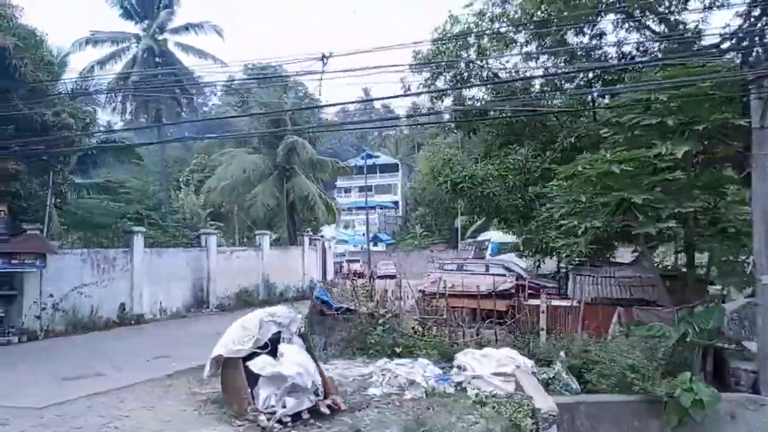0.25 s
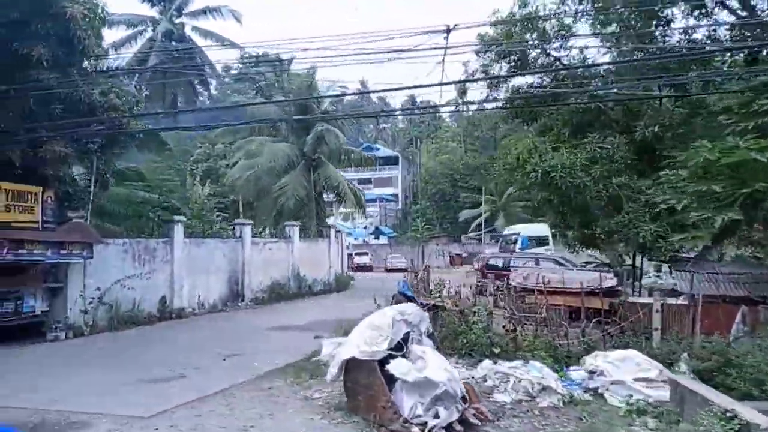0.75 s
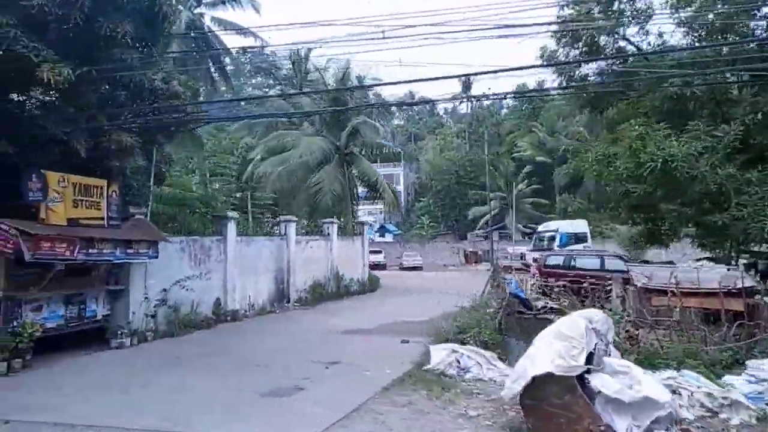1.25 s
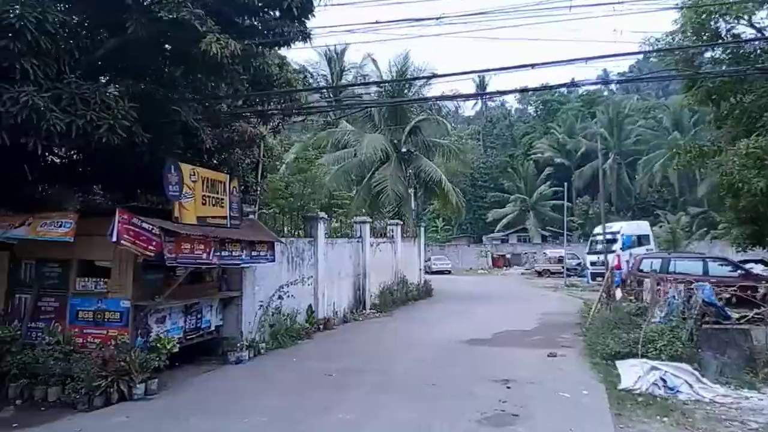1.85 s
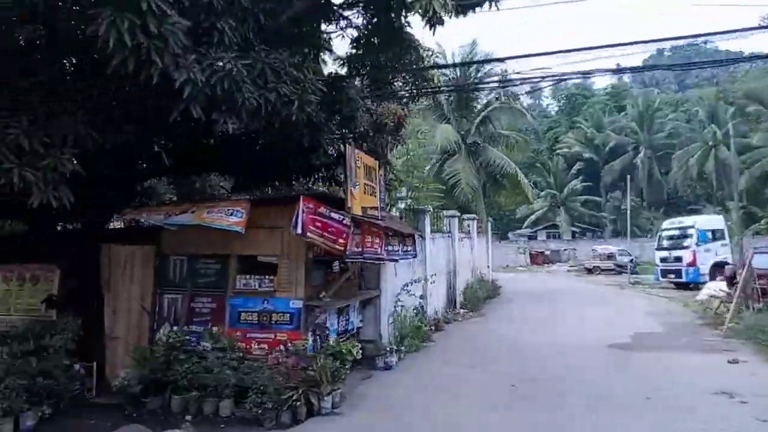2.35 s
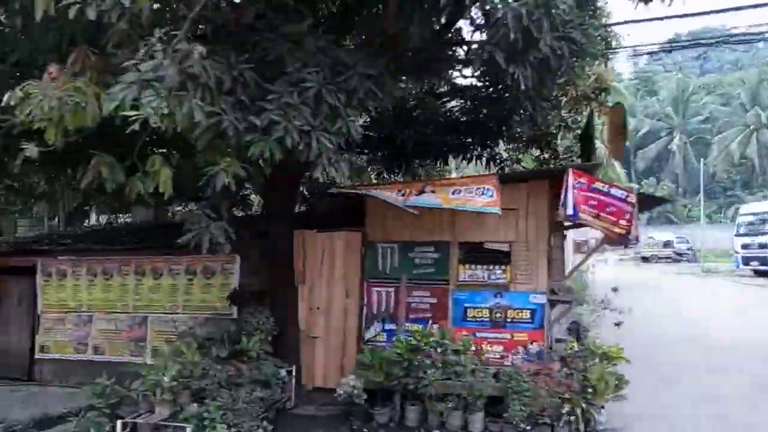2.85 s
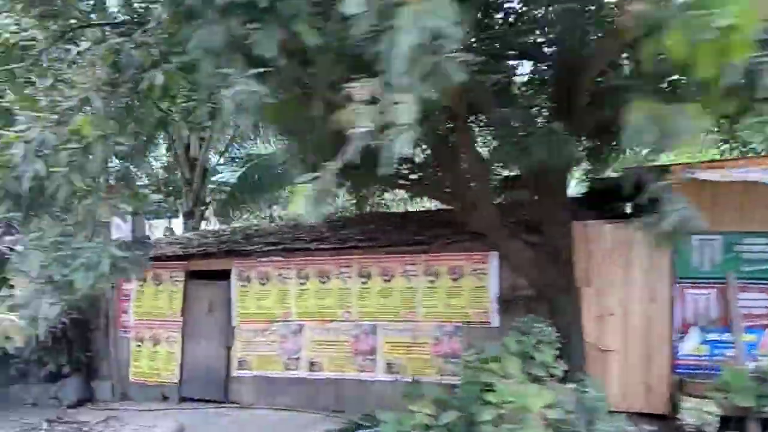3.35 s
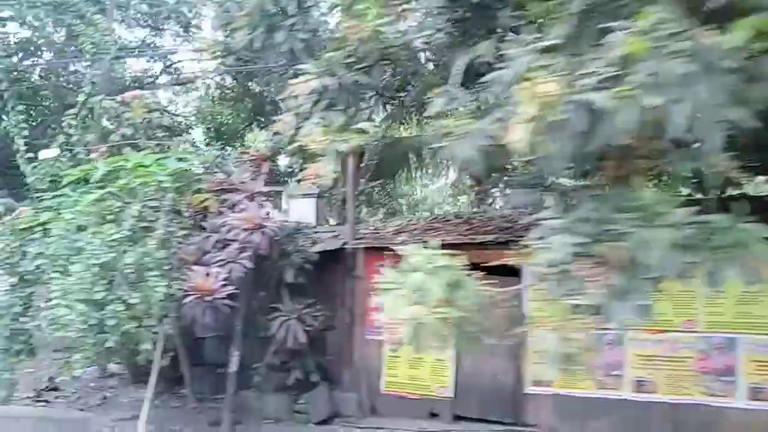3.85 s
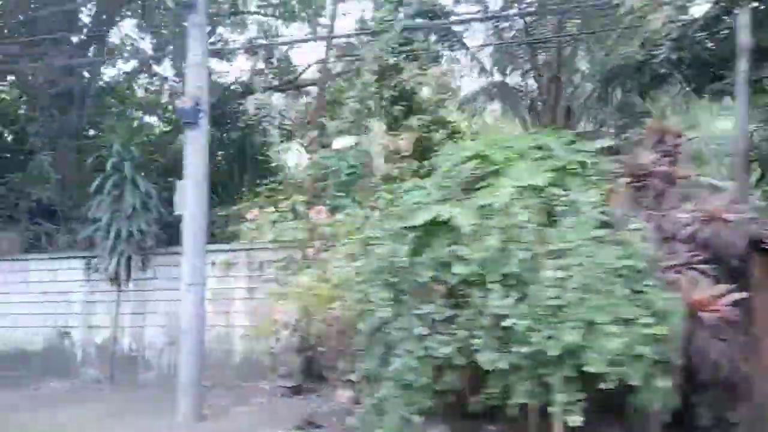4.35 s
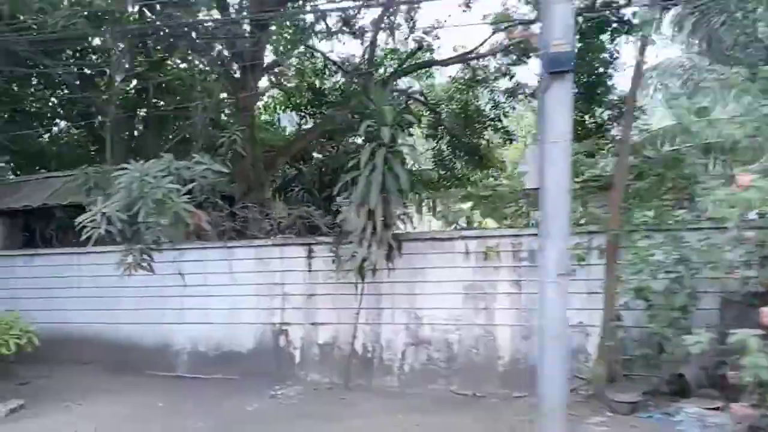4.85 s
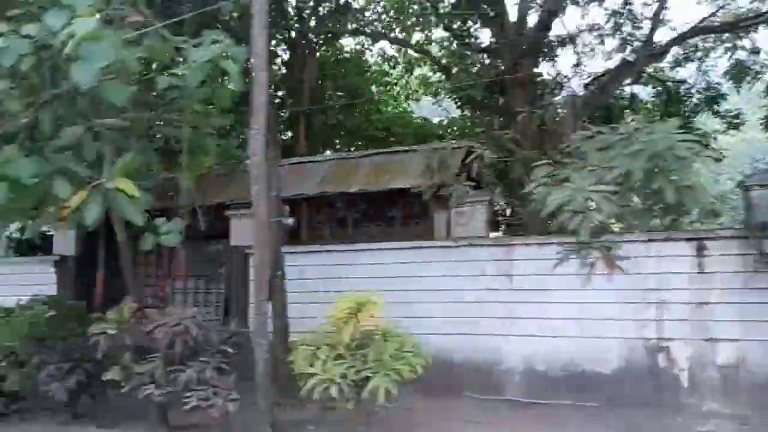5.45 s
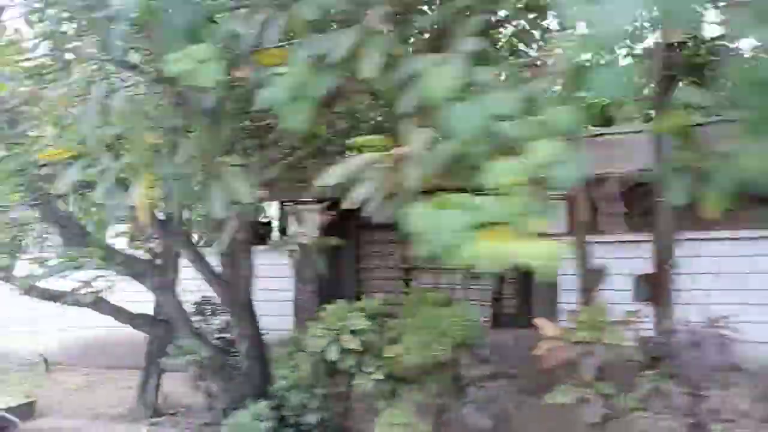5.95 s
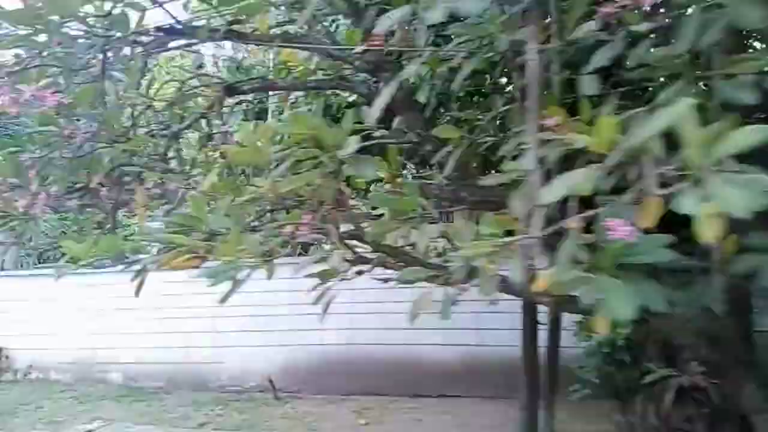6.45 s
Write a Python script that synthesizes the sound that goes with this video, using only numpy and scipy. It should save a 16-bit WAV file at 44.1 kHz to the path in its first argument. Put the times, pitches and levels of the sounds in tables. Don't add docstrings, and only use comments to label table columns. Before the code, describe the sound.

An open vehicle gathers speed on a small road between walls and trees, heard close from a wind-exposed microphone beside the driver. From 0 s, low throbbing exhaust beats rise smoothly in pitch over steady tyre and engine-bay roar, with rumbling, uneven wind gusts and sparse ticks. At about 1.8 s comes a thin, clipped electric horn beep with a faint buzzing tail. At 2.6 and 2.7 s two very short, much louder toots follow, nasal, buzzing and slightly distorted, echoing off the roadside; the background ducks and recovers within roughly half a second. Loose fittings rattle around 3.4-4.1 s and knock occasionally afterwards. Engine pitch peaks near 5.7 s, then throttle closes and beats soften and fall. Around 5.9-6.2 s faint, very high brake squeaks and more ticks appear under strong wind, which drops near 6.6 s with two tiny lower chirps before the end at 6.7 s.

```python
import sys
import numpy as np
from scipy import signal
from scipy.fft import rfft, irfft, next_fast_len
from scipy.io import wavfile
from scipy.ndimage import uniform_filter1d, minimum_filter1d

SR = 44100
rng = np.random.default_rng(int(sys.argv[2]) if len(sys.argv) > 2 else 0)


def log_audio(samples):
    frames = np.atleast_2d(samples).T
    limited = np.clip(frames, -1, 1)
    pcm = np.round(limited * 32767).astype(np.int16)
    wavfile.write(sys.argv[1], SR, pcm)


def elevation(decibels):
    levels = np.asarray(decibels, float)
    return 10 ** (levels / 20)


N = 295117
TIME = np.arange(N) / SR


def rms_one(x):
    return x / np.sqrt(np.mean(x ** 2) + 1e-20)


def in_time(rows, t=TIME):
    s, *columns = np.transpose(rows)
    return [np.interp(t, s, c) for c in columns]


def at_hz(points, hz):
    points_hz, points_db = np.array(points).T
    return np.interp(np.log(hz), np.log(points_hz), points_db)


def drift(rate, size=N):
    r = np.exp(-80 * np.pi * rate / SR)
    settling = 2000
    slow = signal.lfilter([1], [1, -2 * r, r * r], rng.standard_normal(size // 40 + 2 + settling))
    return np.interp(np.arange(size) / 40, np.arange(size // 40 + 2), rms_one(slow)[settling:])


def resonance(x, hz, width_hz):
    r = np.exp(-np.pi * width_hz / SR)
    gain = (1 - r * r) / 2
    return signal.lfilter([gain, 0, -gain], [1, -2 * r * np.cos(2 * np.pi * hz / SR), r * r], x)


def band_pass(x, order, low_hz, high_hz):
    return signal.sosfilt(signal.butter(order, [low_hz, high_hz], "band", fs=SR, output="sos"), x)


def banded_noise(colour, shared_db, own_db, speed):
    low_hz, top_hz = colour[0][0], min(colour[-1][0], .45 * SR)
    edges = np.geomspace(low_hz, top_hz, int(2 * np.log2(top_hz / low_hz)) + 2)
    white, together, out = rng.standard_normal((2, N)), drift(speed), 0
    for k, (low, high) in enumerate(zip(edges, edges[1:])):
        flicker_db = shared_db * together + own_db * drift(speed)
        out = out + band_pass(white[k % 2], 2, low, high) * elevation(flicker_db)
    size = next_fast_len(N)
    shape = elevation(at_hz(colour, np.arange(size // 2 + 1) * SR / size + 1))
    return rms_one(irfft(rfft(out, size) * shape, size)[:N])


def engine(waver_db, count=14):
    # (time [s], firing rate [Hz])
    revs = [(0, 27.8), (.6, 30.2), (1.2, 34), (1.8, 37.2), (2.45, 42), (2.9, 44.2), (3.5, 49.2), (4.2, 53),
            (4.65, 56), (5.26, 60.2), (5.7, 63), (5.9, 61.5), (6.15, 54), (6.69, 43)]
    # (time [s], load [dB])
    throttle = [(0, -18), (.4, -21), (.9, -18), (1.4, -20), (1.8, -21), (2.3, -22.5), (2.9, -17.5),
                (3.5, -17.5), (4.2, -18.5), (4.7, -18.5), (5.3, -16), (5.75, -14), (5.95, -15), (6.3, -28),
                (6.69, -30)]
    # (time [s], overtone tilt [dB/octave])
    strain = [(0, -1), (1, -1.5), (2.2, 0.5), (3, -2), (4, 2.5), (4.6, -1), (5.2, 1), (5.75, -1.5),
              (6.3, -17), (6.69, -19)]
    # (frequency [Hz], level [dB])
    exhaust = [(28, -42), (42, -10.5), (58, -9.5), (80, -5.5), (105, -3), (140, -13), (200, -18.5),
               (300, -12.5), (450, -28), (700, -42.5)]
    firing_hz, load_db, tilt_db = in_time(revs)[0], in_time(throttle)[0], in_time(strain)[0]
    turn = 2 * np.pi * np.cumsum(firing_hz * (1 + 0.0022 * drift(3.2))) / SR
    out = 0
    for k in range(1, count + 1):
        level_db = at_hz(exhaust, k * firing_hz) + tilt_db * np.log2(k)
        level_db = level_db + waver_db * np.sqrt(k) * drift(1.47) + 2.55 * drift(18.4)
        out = out + elevation(level_db) * np.sin(k * turn + rng.uniform(0, 2 * np.pi))
    return np.sqrt(2) * elevation(load_db) * out, turn


def swing_db(t, hold, swell_db, t60):
    attack_s = 0.0062
    rise = 20 * np.log10(np.clip(t / attack_s, 1e-3, 1) ** 2)
    return rise + swell_db * (np.clip(t / hold, 0, 1) - 1) - 60 * np.maximum(t - hold, 0) / t60


def horn(chatter_db, rasp_db, count=22):
    # (start [s], hold [s], tone [dB], buzz [dB], settled pitch [Hz])
    high_presses = [
        (1.827, 0.016, -4, -8, 531.7),
        (1.864, 0.13, -27.5, -19.5, 540),
        (2.601, .058, 5, -0.5, 524.6),
        (2.693, 0.059, 5.5, -0.9, 522.3),
    ]
    # (lag [s], level [dB], sum tones [dB], settled pitch [Hz])
    low_presses = [
        (0.0081, -22, 10, 446),
        (0.0097, -46, -15, 432),
        (0.0027, -12.5, -4, 400),
        (0.007, -5, -33, 413),
    ]
    # (frequency [Hz], level [dB])
    high_bell = [(1060, 0), (1600, -6), (2120, -4), (2650, -7.5), (3200, -13), (3750, -15), (4200, -21),
                 (4750, -29), (5300, -35), (8000, -62), (12000, -80)]
    # (frequency [Hz], level [dB])
    low_bell = [(420, -2), (840, -6), (1260, -9), (1700, -12), (2300, -8), (3000, -16), (3400, -14),
                (4200, -26), (6000, -46), (10000, -70)]
    # (frequency [Hz], level [dB])
    sum_bell = [(980, -4), (1430, -6), (1980, -9), (2420, -8), (2960, -15), (3400, -14), (3950, -16),
                (4400, -22), (6000, -50), (10000, -76)]
    # (frequency [Hz], width [Hz], level [dB])
    bracket = [(1125, 17, -28.5), (1525, 17, -23), (2255, 17, -5.5)]
    buzz_swell_db, buzz_t60_s, buzz_early_s, buzz_least_s = 1, 0.088, 0.02, .04
    blat_db, blat_s, blat_top_hz, weak_loss_db = 16.5, 0.026, 1150, 6.5
    out, rasp = np.zeros(N), np.full(N, 1e-18)
    t = TIME[:SR // 4]
    sharp_hz = 20 * np.exp(-t / .012)
    for (s, hold, tone_db, buzz_db, high_hz), (lag, low_db, sum_db, low_hz) in zip(high_presses, low_presses):
        span = slice(int(s * SR), int(s * SR) + len(t))
        high_hz, low_hz = high_hz + sharp_hz, low_hz + sharp_hz
        high, low = 2 * np.pi * np.cumsum([high_hz, low_hz], axis=1) / SR
        strong = np.clip(tone_db / 8, 0, 1)
        fizz_gain = elevation(-46 + (.3 - 2) * buzz_db)
        rasp_gain = elevation((0.88 - 1) * buzz_db)

        tone_db = tone_db + swing_db(t, hold, swell_db=1.5, t60=0.14)
        buzz_hold = max(hold - buzz_early_s, buzz_least_s)
        buzz_db = buzz_db + swing_db(t, buzz_hold, buzz_swell_db, buzz_t60_s)
        late_db = swing_db(t - lag, hold - lag - buzz_early_s, buzz_swell_db, buzz_t60_s)
        low_db, sum_db = low_db + late_db, sum_db + late_db
        blat = strong * blat_db * (2 * np.exp(-t / blat_s) - 1) - (1 - strong) * weak_loss_db

        out[span] += elevation(tone_db) * np.sin(high)
        lines = [(k, 0, buzz_db, high_bell) for k in range(2, count)]
        lines += [(0, k, low_db, low_bell) for k in range(1, count)]
        lines += [(k // 2, k - k // 2, sum_db, sum_bell) for k in range(2, count)]
        lines += [(k + 1, k, sum_db - 0.5, sum_bell) for k in range(1, count // 2)]
        for m, n, level_db, bell in lines:
            level_db = level_db + at_hz(bell, m * high_hz + n * low_hz) + chatter_db * drift(81, size=len(t))
            if not n and m * high_hz[-1] < blat_top_hz:
                level_db = level_db + blat
            phase = m * high + n * low - 0.58 * (m + n) + .5 * drift(28, size=len(t))
            out[span] += elevation(level_db) * np.cos(phase)

        rasp[span] += rasp_gain * elevation(buzz_db) * (1 + np.cos(high)) * rng.standard_normal(len(t))
        fizz = band_pass(rng.standard_normal(len(t)), 2, 4500, 8000)
        out[span] += fizz_gain * signal.lfilter([.001], [1, -.999], elevation(buzz_db)) * fizz
    out += elevation(rasp_db) * band_pass(rasp, 4, 1300, 4800)
    for hz, width_hz, level_db in bracket:
        out += elevation(level_db + 17.0) * resonance(rasp, hz, width_hz)
    return out


def wind():
    # (time [s], buffeting [dB])
    stream = [(0, -28.5), (.3, -17), (1.3, -18), (1.9, -18), (2.55, -13.5), (3.25, -18), (3.6, -16),
              (4.3, -13.5), (4.75, -15.5), (5.4, -12), (5.7, -12.5), (6.0, -10), (6.33, -9), (6.55, -9),
              (6.61, -18.5), (6.69, -21)]
    # (time [s], swell [dB], length [s])
    gusts = [(0.133, 8, 0.06), (0.244, -11, 0.018), (0.265, 5, 0.035), (1.58, 3, 0.065), (1.62, -17, 0.026),
             (1.673, 7, 0.046), (1.782, 9.5, 0.021), (2.72, 1.5, 0.027), (2.773, -13, 0.064),
             (3.348, 7, 0.022), (3.417, 6.5, 0.054), (3.714, 8.5, 0.051), (4.33, 1.5, 0.016),
             (4.408, -9, 0.035), (4.477, 6, .06), (4.558, 8, 0.035), (4.915, 5.5, .06), (5.488, 8.5, 0.018),
             (5.564, 3.5, 0.065), (5.976, 2, 0.084), (6.035, -8, 0.021), (6.215, 7.5, 0.016),
             (6.334, 5, 0.1), (6.495, 3, 0.046)]
    # (frequency [Hz], density [dB per Hz])
    colour = [(30, -38), (60, -3), (110, 5), (200, 1), (330, 0.5), (500, -8.5), (800, -17.5), (1500, -61.5)]
    level_db = in_time(stream)[0] - 4.5
    for s, swell_db, length in gusts:
        late = (TIME - s) / length
        late = np.where(late < 0, late / 0.82, late)
        level_db = level_db + swell_db * np.exp(-2 * late ** 2)
    return elevation(level_db) * banded_noise(colour, shared_db=0.0, own_db=1.5, speed=88)


def roar(turn, throb):
    # (time [s], level [dB])
    swell = [(0, -24.5), (.27, -22.5), (.4, -24), (1, -23), (1.5, -23), (2, -23), (2.9, -21), (3.3, -22),
             (3.6, -20.5), (3.98, -23), (4.1, -20), (4.22, -23.5), (5.1, -23), (5.6, -22), (5.9, -22.5),
             (6.1, -26.5), (6.4, -28), (6.69, -30.5)]
    # (frequency [Hz], density [dB per Hz])
    roar_colour = [(250, -36.5), (400, 4.5), (520, 1), (720, -0.5), (940, 0), (1150, 1), (1450, -3.5),
                   (2200, -2), (3000, -8.5), (3900, -13.5), (4500, -22.5), (5300, -36.5), (7000, -75.5)]
    # (frequency [Hz], density [dB per Hz])
    hiss_colour = [(4800, -12), (5600, -5.5), (6100, 0.5), (7000, -2.5), (8200, -4.5), (9000, -16.5),
                   (10000, -31), (13000, -26.5), (15800, -19)]
    # (frequency [Hz], width [Hz], level [dB])
    panels = [(924, 17, -12), (1110, 17, -34), (2160, 32, -32)]
    roar_db, = in_time(swell)
    hiss_db = -60.5 + 0.77 * TIME + 1.2 * (roar_db + 24)
    body = banded_noise(roar_colour, shared_db=1.0, own_db=0.21, speed=8.0)
    for hz, width_hz, level_db in panels:
        body = body + elevation(level_db) * rms_one(resonance(rng.standard_normal(N), hz, width_hz))
    hiss = banded_noise(hiss_colour, shared_db=0.7, own_db=0.8, speed=22)
    return (elevation(roar_db) * body + elevation(hiss_db) * hiss) * (1 + throb * np.sin(turn))


def ticks(snap_s, ring_hz):
    # (time [s], peak [dB], ring against the peak [dB])
    knocks = [(0.5213, -38.5, 6), (0.7243, -46, 4), (1.3773, -44, 4), (1.641, -40, 4), (2.313, -44, -3.5),
              (2.5245, -47, 16), (3.3917, -34.5, 15), (3.424, -32, 10), (3.504, -36, 4),
              (3.5955, -38.5, 17), (4.052, -40.5, -2), (4.082, -29.5, 12), (4.11, -42, 22),
              (4.139, -37, 12), (4.658, -52, 4), (4.7007, -41.5, 15), (4.7444, -43.5, 15),
              (4.989, -38.5, 5), (5.0893, -36, 13), (5.3217, -40, 18), (6.0777, -35.5, 17), (6.125, -37, 4),
              (6.1567, -35, 13), (6.185, -49, 16), (6.203, -42, 15), (6.283, -46.5, 23), (6.3928, -50, 8),
              (6.499, -42, 18.5), (6.5785, -36.5, 13)]
    s, peak_db, ring_db = np.transpose(knocks)
    snaps, rings = np.zeros(N), np.full(N, 1e-18)
    snaps[(s * SR).astype(int)] = elevation(peak_db)
    rings[((s + .003) * SR).astype(int)] = elevation(peak_db + ring_db)
    dying = signal.lfilter([1], [1, -np.exp(-1 / (snap_s * SR))], snaps + 1e-18)
    bright = rms_one(band_pass(rng.standard_normal(N), 3, 5800, 8200))
    air = elevation(-31) * rng.standard_normal(N)
    soft = resonance(resonance(rings, ring_hz, width_hz=490), ring_hz, width_hz=490)
    return .5 * dying * (bright + air) + 50 * resonance(soft, ring_hz, width_hz=180)


def squeaks(tremble_db):
    # (start [s], length [s], pitch [Hz], glide [Hz], level [dB])
    whistles = [
        (5.855, .05, 10950, 80, -76),
        (5.865, .09, 11700, 88, -63),
        (5.95, .04, 12160, 0, -73),
        (5.94, 0.14, 11500, -50, -61),
        (6.04, .04, 11900, -150, -75),
        (6.046, .06, 11430, -42, -62),
        (6.124, .11, 11450, -90, -67),
        (6.6, 0.04, 5100, 60, -50),
        (6.641, .038, 3110, 146, -42),
    ]
    out, t = np.zeros(N + SR), TIME[:SR // 8]
    for s, length, hz, glide_hz, level_db in whistles:
        done = np.clip(t / length, 0, 1)
        fade = np.sin(np.pi * done ** 0.62) ** 0.55
        shake = elevation(level_db + tremble_db * drift(60, size=len(t))) * fade
        hz = (hz + glide_hz * done) * (1 + 0.004 * drift(150, size=len(t)))
        out[int(s * SR):][:len(t)] += np.sqrt(2) * shake * np.sin(2 * np.pi * np.cumsum(hz) / SR)
    return out[:N]


def roadside(x, scatter_db, t60):
    # (delay [s], level [dB])
    walls = [(.007, -18), (0.015, -8.5), (0.031, -12.5), (0.046, -36), (.118, -36)]
    t = TIME[:SR // 2]
    tail = rng.standard_normal(len(t)) * elevation(-60 * t / t60) * np.clip(t / 0.0043, 0, 1)
    response = elevation(scatter_db) * tail / np.sqrt(np.sum(tail ** 2))
    for delay, level_db in walls:
        response[int(delay * SR)] += elevation(level_db)
    return signal.fftconvolve(band_pass(x, 3, 900, 6000), response)[:N]


def scene():
    beats, turn = engine(waver_db=1.0)
    toots = horn(chatter_db=5.5, rasp_db=-7)
    toots = toots + roadside(toots, scatter_db=-10.0, t60=0.76)
    ride = beats + roar(turn, throb=0.1) + wind()
    fittings = ticks(snap_s=0.0029, ring_hz=3990) + squeaks(tremble_db=5.0)
    return (ride + toots + fittings)[None]


def ducking(x):
    from_db, most_db, look_ahead_s, hold_s, recover_s = -8.5, 8.5, 0.017, 0.011, 0.24
    mid = band_pass(x, 2, 450, 4000)
    level_db = 10 * np.log10(uniform_filter1d(mid ** 2, size=256) + 1e-12)
    cut = np.clip(2 * (level_db - from_db), 1e-3, most_db)
    held = -minimum_filter1d(-cut, int(hold_s * SR))
    held = np.interp(TIME + look_ahead_s - hold_s / 2, TIME, held)
    easing = np.exp(np.maximum.accumulate(np.log(held) + TIME / recover_s) - TIME / recover_s)
    return -uniform_filter1d(easing, int(.014 * SR))


def low_pass(x):
    return signal.sosfilt(signal.butter(12, 15820, fs=SR, output="sos"), x)


def record(dry):
    ducked = dry * elevation(ducking(dry[0]))
    knee, top = 11.0, .93
    flat = ducked / (1 + np.abs(ducked / top) ** knee) ** (1 / knee)
    dull = signal.lfilter(*signal.butter(1, 7800, fs=SR), flat)
    dull = signal.sosfilt(signal.ellip(8, .5, 60, 15750, fs=SR, output="sos"), dull)
    mix = dull * np.clip((N - np.arange(N)) / 200, 0, 1)
    return low_pass(mix)


dry = scene()
out = record(dry)
log_audio(out)
```